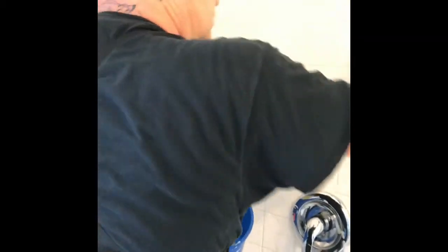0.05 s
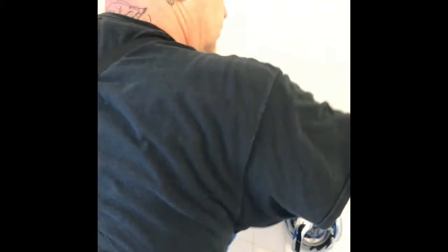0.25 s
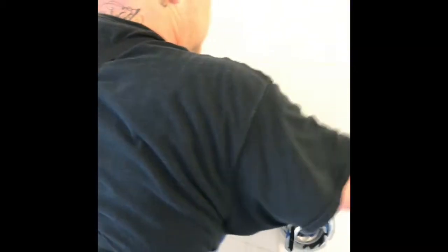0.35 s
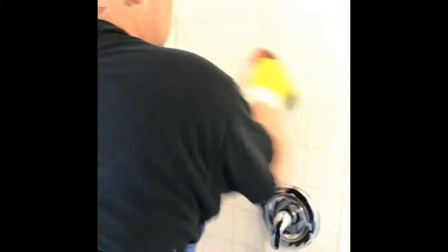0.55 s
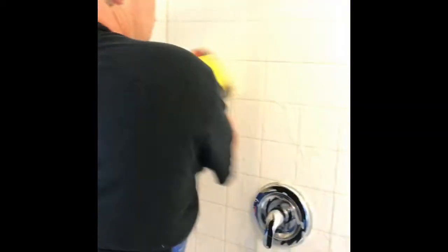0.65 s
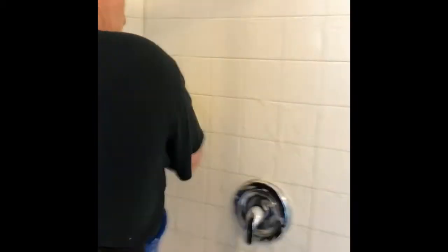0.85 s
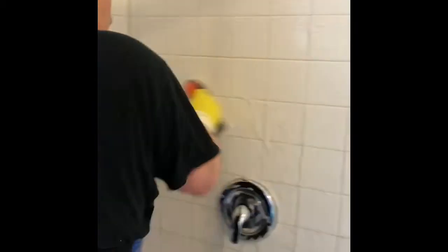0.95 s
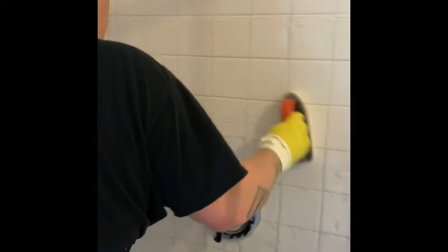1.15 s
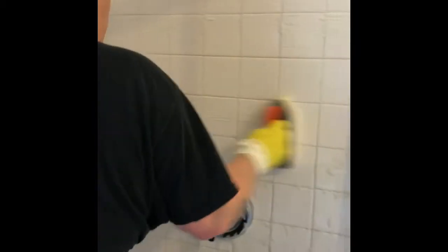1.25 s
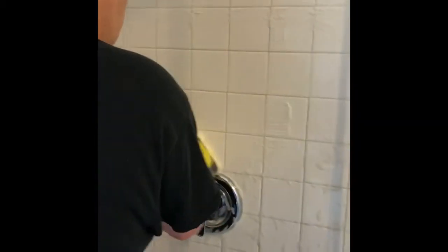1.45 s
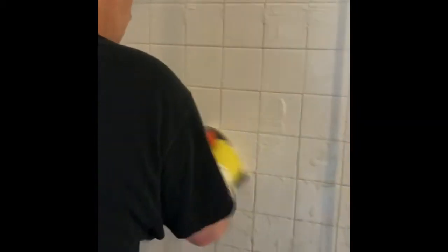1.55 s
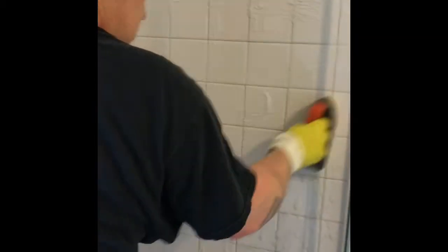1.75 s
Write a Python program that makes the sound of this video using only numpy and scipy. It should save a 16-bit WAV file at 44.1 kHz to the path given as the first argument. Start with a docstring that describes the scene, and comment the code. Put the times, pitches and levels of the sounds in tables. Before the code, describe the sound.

Brisk wet scrubbing of bristles on bathroom tiles, interrupted early by a loud, booming wall knock

```python
"""Scrubbing wet shower tiles

A stiff brush scrubs wet wall tiles in a small shower stall: random flicks and wet hiss, plus a dull drag.
Early on something knocks the hollow wall hard: short pushes set wall tones ringing, over a noisy tail.
The scrubbing sinks for a moment around then. Fading single tones make the soft low bumps of hand and
brush, and the wall's late ringing after the knock.
Underneath lie a swelling deep boom, a wavering low hum and a dull noise floor.
"""
import sys
import numpy as np
from scipy import signal
from scipy.io import wavfile

SR = 44100
rng = np.random.default_rng(int(sys.argv[2]) if len(sys.argv) > 2 else 0)


def persist_wave(psi):
    """Save psi, clipped to +-1, as 16-bit WAV."""
    counts = np.round(np.clip(psi, -1, 1) * 32767).astype(np.int16)
    wavfile.write(sys.argv[1], SR, np.atleast_2d(counts).T)


def decibels_to_gain(level_db):
    """Convert a level in decibels to a linear amplitude gain (20 dB per decade)."""
    exponent = np.asarray(level_db, float) / 20
    return 10 ** exponent


N = 79380  # length in samples: 1.8 s

# Levels in these tables are relative, unless a sound uses them with nothing added.
# Deep boom swelling and sinking: t/s, level/dB
BOOM_LEVELS = [(0.0, -58), (0.044, -53), (0.184, -67), (0.264, -55), (0.294, -51), (0.34, -44), (0.38, -44),
               (0.536, -48.5), (0.566, -54.5), (0.686, -52), (0.906, -62), (1.046, -58), (1.168, -72),
               (1.242, -47.5), (1.322, -50), (1.362, -78), (1.418, -48), (1.464, -66), (1.604, -51.5),
               (1.654, -73), (1.768, -48), (1.8, -44.5)]
# Wavering hum: f/Hz, approximate width/Hz, level/dB
HUM_TONES = [(116, 27, -64.5)]
# Colour of the dull floor: f/Hz, level per Hz/dB
FLOOR_COLOUR = [(25, -18), (40, -8), (60, -17), (120, 11), (250, 3.5), (400, -12), (600, 4.5), (1500, -6.5),
                (2500, -45)]
# Soft bumps of hand and brush; the rows near 198 Hz are the wall's late ringing after the knock:
# t/s, starting level/dB, f/Hz, time to fall 60 dB/s
FADING_TONES = [(.0, -41, 126.5, 0.21), (.06, -45, 265, 0.14), (0.354, -22, 198.4, 0.21),
                (.41, -31.5, 199, 0.37), (.5, -39, 198, .5), (.545, -29.5, 488, .07),
                (0.551, -34, 342, 0.075), (0.599, -34.5, 326.5, 0.14), (.675, -28.5, 545, 0.045),
                (.678, -39, 760, 0.034), (.81, -36, 852, .08), (.98, -35, 107, 0.096),
                (1.009, -35.5, 110, 0.11), (1.043, -30.5, 110, .12), (1.098, -32.5, 111, 0.089),
                (1.209, -31, 188, 0.081), (1.226, -30, 107, 0.1), (1.234, -31.5, 260, 0.041),
                (1.418, -35.5, 559, 0.2), (1.426, -36.5, 327, 0.14), (1.455, -39, 571, 0.31),
                (1.495, -46, 593, 0.14), (1.587, -44, 131, 0.22), (1.719, -35.5, 117, 0.15),
                (1.769, -36.5, 170, 0.12), (1.772, -45, 746, .05)]
# The hard knock and its rebounds: t/s, strength/dB, contact time/ms
KNOCK_CONTACTS = [(0.2447, -34, 0.81), (0.2477, -16.5, 0.52), (0.2543, -33.5, 0.31), (0.2635, -15.5, 2.43),
                  (.268, -24.5, 0.43), (.279, -19.5, 1.53), (.288, -23, 0.84), (.320, -30.5, 0.46),
                  (.358, -28, 2.33)]
# Ringing tones of the hollow wall: f/Hz, level/dB, time to fall 60 dB/s
WALL_TONES = [(69.4, -4.5, 0.167), (110.8, -6.5, 0.3), (164, -4, 0.12), (192.6, -7, 0.28),
              (286.5, -4.5, .2), (335.2, -7, 0.19), (395.8, 4, 0.12), (520, -7, 0.34), (662, 5, 0.1),
              (715.3, -3.5, .35), (761, 4, 0.12), (959, -6, 0.23), (1014, -4.5, 0.25), (1442, -6.5, 0.19),
              (1550, -9, 0.19), (1890, -18, 0.29), (2350, -4, 0.26), (2750, -1.5, 0.098)]
# Colour of the stall ringing on after the knock: f/Hz, level per Hz/dB
TAIL_COLOUR = [(30, -28), (60, 6), (92, -13), (150, -0.5), (400, 0.5), (750, -1), (850, -8), (1500, -4.5),
               (2300, -13), (3500, -27), (4200, -24), (5000, -34), (9000, -64), (12000, -80)]
# How long that tail lasts: f/Hz, time to fall 60 dB/s
TAIL_DECAY = [(50, 0.19), (130, 0.6), (350, 0.46), (920, 0.51), (2430, 0.27), (6400, 0.14)]
# How slowly that tail builds up, lows slowest: f/Hz, rise time/s
TAIL_RISE = [(60, 0.0075), (200, 0.0055), (700, 0.0013), (4000, .001)]
# Brush strokes: t/s, bristle hiss level/dB, extra drag level/dB
BRUSH_STROKES = [(0, -49.5, 7.5), (.064, -43.5, 2), (.124, -42.5, 4), (0.173, -47, 2.5), (.204, -48, 3),
                 (.234, -52, 3.5), (.25, -45.5, -3), (.3, -58, 13), (.354, -65, 11.5), (0.463, -58, -2.5),
                 (.472, -50.5, 2.5), (.522, -48, -0.5), (.535, -43, 0), (.58, -42, 0), (.6, -41.5, -0.5),
                 (.63, -47.5, 2.5), (.641, -43, -3), (.68, -44.5, 2), (.7, -46.5, 0.5), (0.75, -41.5, -1.5),
                 (.766, -48, 2), (.822, -44.5, -2.5), (.872, -47.5, -0.5), (.952, -52, -2), (1.016, -49, 0),
                 (1.092, -47, 1.5), (1.118, -51, 2), (1.15, -49.5, 8), (1.191, -42, -3), (1.22, -43.5, 4),
                 (1.262, -49, -2.5), (1.322, -60.5, 9), (1.345, -50, -3.5), (1.358, -48.5, 1),
                 (1.392, -52.5, 0), (1.41, -46.5, -4), (1.434, -40.5, -1), (1.478, -47, -1),
                 (1.544, -49.5, -4), (1.605, -50, 3), (1.668, -52, -2), (1.69, -52.5, 1.5),
                 (1.706, -49, 7.5), (1.719, -42, -9), (1.763, -46.5, -0.5), (1.775, -44, 6),
                 (1.8, -42.5, -9)]
# Colour of the bristle hiss: f/Hz, level per Hz/dB
BRISTLE_COLOUR = [(800, -6), (1300, -7.5), (2500, -5), (4000, -8.5), (5000, -2.5), (6400, -8.5),
                  (9000, -8.5), (11000, -10.5), (14000, -11), (16000, -4.5)]
# Colour of the brush body dragging on the wall: f/Hz, level per Hz/dB
DRAG_COLOUR = [(59, -26), (100, -2.5), (138, -9), (273, -2.5), (299, -2.5), (328, -6.5), (572, -4),
               (628, -8), (841, -3.5), (4000, -12.5), (5200, -57), (8800, -120)]
# Treble dips of the microphone: f/Hz, width/Hz, share removed (0 to 1)
TREBLE_DIPS = [(5000, 310, 0.36), (7700, 460, 0.28), (10450, 900, 0.39)]


def rms_one(x):
    """Scales a sound to an average strength (rms) of 1."""
    return x / np.sqrt(np.mean(x ** 2) + 1e-20)


def at_hz(points, hz):
    """Reads a table between its rows, on a logarithmic pitch scale."""
    table = np.array(points)
    return np.interp(np.log(hz), np.log(table[:, 0]), table[:, 1])


def drift(rate_hz):
    """Slow random wandering of spread 1: noise smoothed twice; a higher rate wanders faster."""
    step = 40  # computed only at every 40th sample
    r = np.exp(-2 * np.pi * rate_hz * step / SR)
    noise = rng.standard_normal(N // step + 2002)
    slow = signal.lfilter([1], [1, -2 * r, r * r], noise)[2000:]  # skip the start-up
    return np.interp(np.arange(N) / step, np.arange(len(slow)), rms_one(slow))


def ring(x, hz, t60):
    """A resonance: a unit click sets off a sine of height 1 that falls 60 dB in t60 seconds."""
    r = decibels_to_gain(-60 / (t60 * SR))
    w = 2 * np.pi * hz / SR
    return signal.lfilter([0, np.sin(w)], [1, -2 * r * np.cos(w), r * r], x + 1e-18)


def bands(sources, colour, shape):
    """Colours two unrelated sources in third-octave bands; shape(hz) is a band's gain over time."""
    edges = 25 * 2 ** np.arange(0, 9.5, 1 / 3)
    edges = edges[(edges > colour[0][0] * .8) & (edges < colour[-1][0] * 1.3)]
    plain, shaped = 0, 0
    for k, (low, high) in enumerate(zip(edges, edges[1:])):
        middle = np.sqrt(low * high)
        sos = signal.butter(2, [low, high], "band", fs=SR, output="sos")
        # neighbouring bands take turns between the two sources
        band = decibels_to_gain(at_hz(colour, middle)) * signal.sosfilt(sos, sources[k % 2])
        plain = plain + band
        shaped = shaped + band * shape(middle)
    return shaped / np.sqrt(np.mean(plain ** 2))


def boom():
    """A deep sine whose pitch wanders slightly while its level swells and sinks."""
    pitch_hz, wander_hz = 57, 2.5
    t = np.arange(N) / SR
    wander_cycles = np.cumsum(wander_hz * drift(9.3)) / SR
    tone = np.sqrt(2) * np.sin(2 * np.pi * (pitch_hz * t + wander_cycles))
    return decibels_to_gain(np.interp(t, *np.transpose(BOOM_LEVELS))) * tone


def hum():
    """Noise through a narrow resonance makes a tone that wavers."""
    out = np.zeros(N)
    for hz, width_hz, db in HUM_TONES:
        tone = ring(rng.standard_normal(N + SR), hz, 2.6 / width_hz)[SR:]  # skip the build-up
        out += decibels_to_gain(db) * rms_one(tone)
    return out


def background():
    """Deep boom and wavering hum over a dull noise floor whose bands wander in level."""
    floor_db, wander_db = -56.5, 3.0
    noise = rng.standard_normal((2, N))
    floor = bands(noise, FLOOR_COLOUR, lambda hz: decibels_to_gain(wander_db * drift(2)))
    return boom() + hum() + decibels_to_gain(floor_db) * floor


def stall(x):
    """Tiled walls send back a dense, fading crowd of echoes, modelled as decaying noise."""
    t60_s, first_echo_s = 0.49, .004
    t = np.arange(SR // 2) / SR
    echoes = rms_one(rng.standard_normal(len(t))) * decibels_to_gain(-60 * t / t60_s) * (t > first_echo_s)
    echoes = echoes * np.sqrt(6 * np.log(10) / (t60_s * SR))  # total energy near 1
    return signal.fftconvolve(x, echoes)[:N]


def bumps_and_late_ringing():
    """Each bump or late wall ringing is one tone that swells over a cycle or two, then fades."""
    rise_cycles, rough_db = 0.53, 2
    out = np.zeros(N)
    t = np.arange(N) / SR
    for start, db, hz, t60 in FADING_TONES:
        age = np.maximum(t - start, 0)
        swell = 1 - np.exp(-age * hz / rise_cycles)
        out += decibels_to_gain(db - 60 * age / t60) * swell * np.sin(2 * np.pi * hz * age)
    return out * decibels_to_gain(rough_db * drift(30))


def knock_force():
    """Each contact is a rounded push; a longer contact is duller."""
    force = np.zeros(N)
    for start, db, ms in KNOCK_CONTACTS:
        push = np.hanning(max(int(ms * SR / 1000), 3) + 2)
        i = int(start * SR)
        force[i:i + len(push)] += decibels_to_gain(db) * push / push.sum()
    return force


def knock():
    """Pushes ring the wall's own tones; a noisy tail dies band by band after a bright first edge."""
    tail_db, tick_db, tick_fade_s = -13.5, -36, 0.0024
    force = knock_force()
    rings = np.zeros(N)
    for k, (hz, db, t60) in enumerate(WALL_TONES):
        level = decibels_to_gain(db + rng.normal(0, 1))  # a little chance in each tone
        rings += level * (-1) ** k * ring(force, hz, t60)
    age = np.maximum(np.arange(N) / SR - KNOCK_CONTACTS[0][0], 0)  # since first contact
    tick = decibels_to_gain(tick_db) * (age > 0) * np.exp(-age / tick_fade_s) * rng.standard_normal(N)

    def rise_and_fall(hz):
        """A band of the tail builds up, then fades."""
        rise = 1 - np.exp(-age / max(at_hz(TAIL_RISE, hz), 1e-4))
        return rise * decibels_to_gain(-60 * age / at_hz(TAIL_DECAY, hz))

    tail = bands(rng.standard_normal((2, N)), TAIL_COLOUR, rise_and_fall)
    return rings + decibels_to_gain(tail_db) * tail + tick


def flicks(per_second):
    """Two trains of random bristle releases of uneven size, with the hiss of the wet film."""
    spread_db, wet_share = 3, 0.47  # wet_share: the hiss's part of the power
    sizes = decibels_to_gain(spread_db * np.minimum(rng.exponential(1, (2, N)), 5))
    signs = rng.choice([-1, 1], (2, N))
    released = rng.random((2, N)) < per_second / SR
    train = rms_one(sizes * signs * released)
    wet_hiss = rng.standard_normal((2, N))
    return np.sqrt(1 - wet_share) * train + np.sqrt(wet_share) * wet_hiss


def brush():
    """Bright hiss of bristles and duller drag of the brush body, both following the strokes."""
    flicks_per_s = 6000
    bristle_db, flicker_db = 2, 1.1
    drag_base_db, drag_follows, patchy_db = -44.5, 0.74, 1  # drag_follows: dB per dB of hiss
    start, hiss_points, drag_points = np.transpose(BRUSH_STROKES)
    t = np.arange(N) / SR
    hiss_db = np.interp(t, start, hiss_points)
    drag_db = np.interp(t, start, drag_points)
    drag_db = drag_base_db + drag_db + drag_follows * (hiss_db - hiss_db.mean())
    shared = drift(35)  # flicker that all bands have in common
    hiss = bands(flicks(flicks_per_s), BRISTLE_COLOUR,
                 lambda hz: decibels_to_gain(flicker_db * (shared + .5 * drift(5))))
    drag = bands(flicks(flicks_per_s / 4), DRAG_COLOUR,
                 lambda hz: decibels_to_gain(patchy_db * (0.57 * shared + drift(9.6))))
    return decibels_to_gain(hiss_db + bristle_db) * hiss + decibels_to_gain(drag_db) * drag


def scene():
    """Brush, bumps and late ringing with the stall's echoes, then the knock and the background."""
    stall_db = -8
    near = brush() + bumps_and_late_ringing()
    return (near + decibels_to_gain(stall_db) * stall(near) + knock() + background())[None]


def roll_off(x):
    """The treble ends steeply here."""
    return signal.sosfilt(signal.butter(12, 17050, fs=SR, output="sos"), x)


def record(dry):
    """A small microphone: thin bass, rounded peaks, dips in the treble and the top cut off."""
    low_hz, peak_top, top_hz = 47, .9, 15750
    x = signal.sosfilt(signal.butter(3, low_hz, "high", fs=SR, output="sos"), dry)
    x = peak_top * np.tanh(x / peak_top)
    for hz, width_hz, share in TREBLE_DIPS:
        x = x - share * signal.lfilter(*signal.iirpeak(hz, hz / width_hz, fs=SR), x)
    x = signal.sosfilt(signal.ellip(12, .5, 70, top_hz, fs=SR, output="sos"), x)
    return roll_off(x)


dry = scene()
out = record(dry)
persist_wave(out)
```